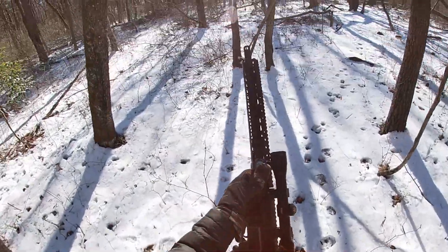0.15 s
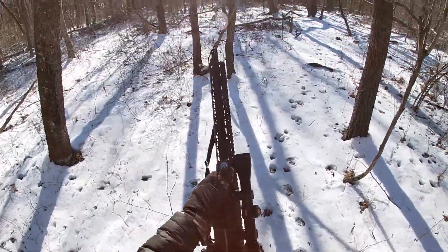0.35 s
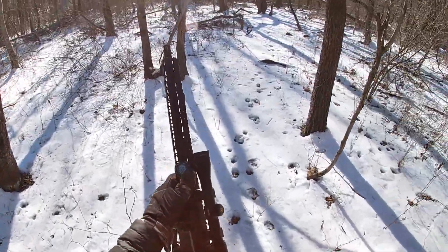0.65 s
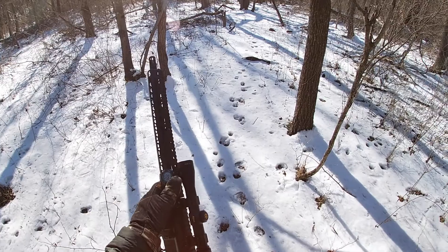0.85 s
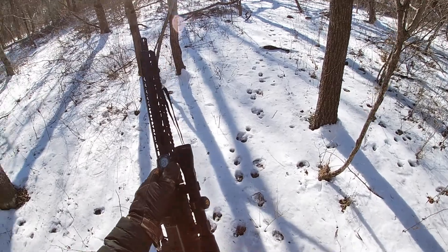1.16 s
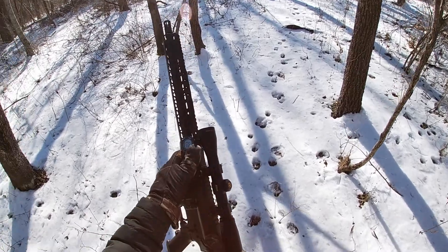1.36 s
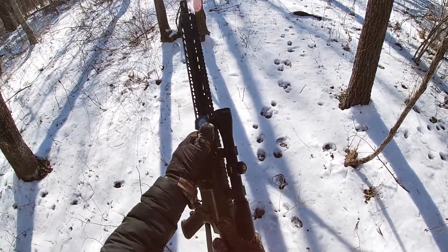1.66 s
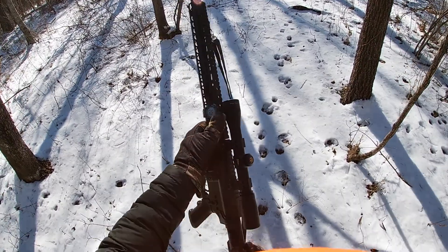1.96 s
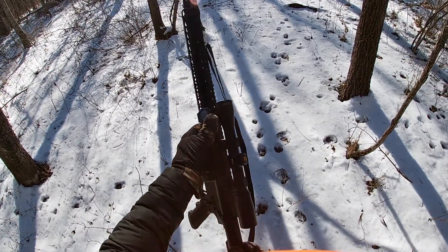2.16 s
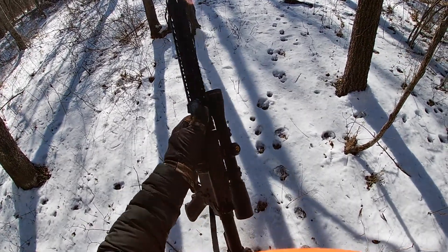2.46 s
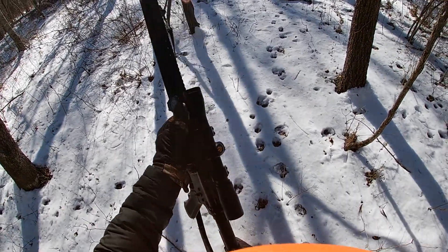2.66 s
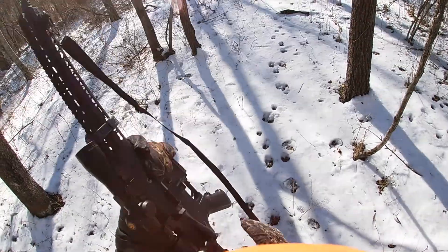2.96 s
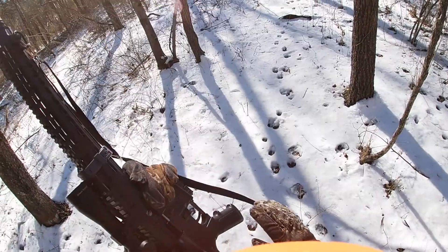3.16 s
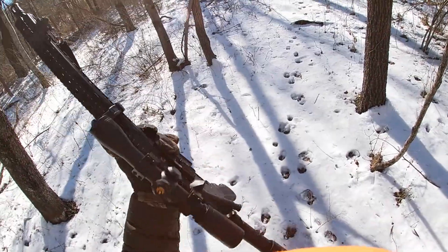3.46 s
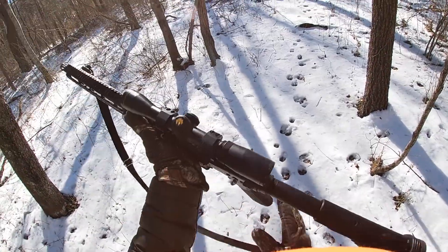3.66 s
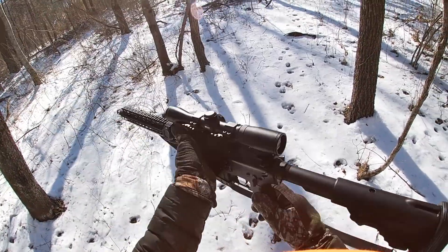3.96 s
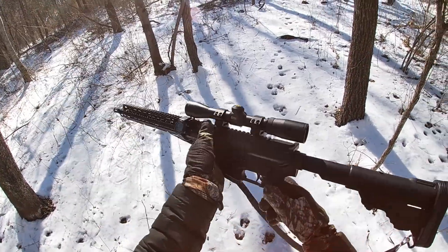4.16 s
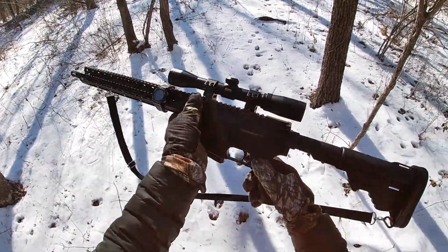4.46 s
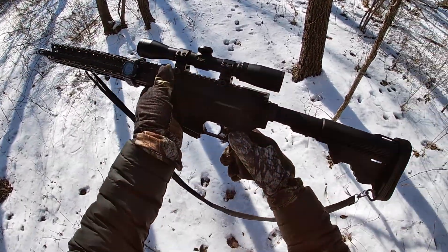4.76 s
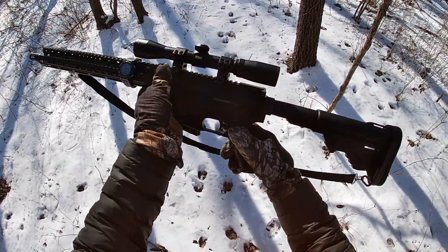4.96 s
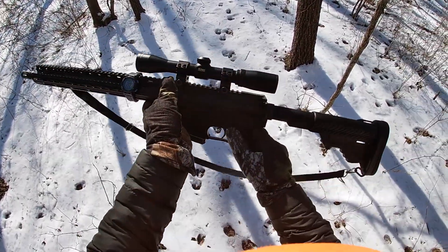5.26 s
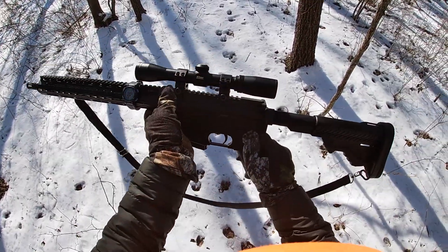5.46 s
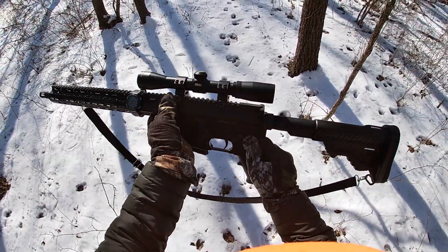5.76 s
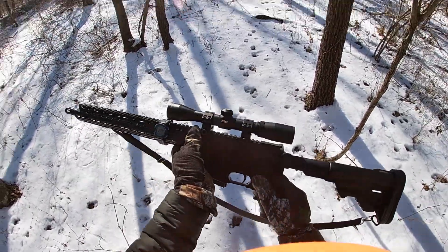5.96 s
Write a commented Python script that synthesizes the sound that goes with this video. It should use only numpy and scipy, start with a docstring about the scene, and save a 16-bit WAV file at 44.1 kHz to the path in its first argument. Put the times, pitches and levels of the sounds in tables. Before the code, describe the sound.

Outdoors among trees, very close and nearly dry. Muted snow crunches about a second apart sit under crisp metallic clicks. Around two seconds a bolt scrapes and clatters back; half a second later it slams forward, the loudest sound, with a short metallic ring and faint woodland echo. The feet stop, then gloves and strap rub and tick quietly, low air drifts, and a final small catch snaps near the end.

```python
"""Snow crunches under three slow steps in a quiet wood, while a rifle is handled close by.
Catches click, the bolt is drawn back and slams shut, the sling swivel pings, and a last catch snaps.
Struck steel is a noise crack with decaying modes; the bolt also sets its recoil spring ringing.
Snow, gloves and sleeves are showers of tiny fractures over finer noise, shaped by each movement.
A low hum swells each time the arms sway, over moving air; the trees answer the steel faintly."""
import sys
import numpy as np
from scipy import signal
from scipy.fft import rfft, irfft, next_fast_len
from scipy.io import wavfile
from scipy.ndimage import map_coordinates

SR = 44100
rng = np.random.default_rng(int(sys.argv[2]) if len(sys.argv) > 2 else 0)


def generate_wav(signal):
    """Clip the signal to [-1, 1] and save it as 16-bit WAV at the path in sys.argv[1]."""
    frames = np.transpose(np.atleast_2d(signal))
    scaled = np.clip(frames, -1, 1) * 32767
    pcm = np.round(scaled).astype(np.int16)
    wavfile.write(sys.argv[1], SR, pcm)


N = 268789
TIME = np.arange(N) / SR  # s
AGE = np.arange(SR * 3 // 4) / SR  # s since a blow

# spectrum of a hard steel contact: (f/Hz, level/dB)
CRACK_SPECTRUM = [(150, -19.5), (500, -6), (1400, -1), (3200, -2), (5600, -3), (7300, -6.5), (9500, -13),
                  (12000, -25), (15500, -26)]
# modes of the steel receiver, damped by the hands: (f/Hz, level/dB, t60/s)
RECEIVER_MODES = [(1020, 1, .046), (1700, -1, .046), (2130, -5.5, .07), (2530, -2, .07), (3200, -6.5, .06),
                  (3620, -4.5, .05), (3970, -1.5, .055), (4930, -7, .054), (5230, -4, .1), (5820, 1, .04),
                  (6140, 1.5, .05), (6480, -10.5, .07), (7190, -7, .12)]
# modes of the hollow handguard: (f/Hz, level/dB, t60/s)
HANDGUARD_MODES = [(1500, -8.5, 0.021), (2010, -8.5, 0.014), (2900, -2, 0.021), (3126, -2, 0.059),
                   (4490, -1.5, 0.026), (4580, -5, 0.016), (5800, -4.5, 0.018), (6400, -3.5, 0.039),
                   (9250, -19, 0.045)]
# spectrum of rubbing glove and strap: (f/Hz, level/dB)
RUB_SPECTRUM = [(400, 5), (800, 1), (1100, 0), (1700, 1), (2500, -3.5), (3200, -4), (3700, -9.5),
                (4600, -10), (5200, -6), (6500, -9.5), (7400, -23), (12000, -33), (15000, -36.5)]
# spectrum of crunching snow, also lent to scratching: (f/Hz, level/dB)
CRUNCH_SPECTRUM = [(530, -33.5), (900, -11.5), (1620, -1.5), (2030, -5), (2390, -4), (3780, -7.5),
                   (7400, -8.5), (8530, -13), (10900, -32), (15000, -41)]
# the arms sway: (t/s, hum level/dB, swish level/dB)
ARM_SWAYS = [(3.918, -48, -72), (5.002, -48, -70), (6.12, -53, -59.5)]


def amp(db):
    """Logarithmic levels: decibels to amplitude gain."""
    return 10 ** (np.asarray(db) / 20)


def unit(x):
    """Normalisation of power: scale to rms 1."""
    return x / np.sqrt(np.mean(x ** 2) + 1e-20)


def along(points, hz):
    """Logarithmic pitch: interpolate (f/Hz, value) points on a log-frequency axis."""
    f, value = np.transpose(points)
    return np.interp(np.log(hz + 1), np.log(f + 1), value)


def fade(t60):
    """Free decay: a damped body loses level at a constant rate, 60 dB in t60 seconds."""
    return 10 ** (-3 * AGE / max(t60, 1e-3))


def add(track, s, sound):
    """Superposition: mix a sound into a track from time s."""
    part = track[max(round(s * SR), 0):][:len(sound)]
    part += sound[:len(part)]


def wobble(rate):
    """Slow fluctuation: a smooth random curve with rate knots a second."""
    knots = rng.standard_normal(int(N * rate / SR) + 4)
    return map_coordinates(knots, [TIME * rate])


def coloured(x, gain_db):
    """Linear filtering: shape x by a dB function of frequency, then scale to rms 1."""
    m = next_fast_len(len(x))
    gain = amp(gain_db(np.fft.rfftfreq(m, 1 / SR)))
    return unit(irfft(rfft(x, m) * gain, m)[:len(x)])


def noise(spectrum):
    """Stationary noise: random pressure with a fixed spectrum."""
    return coloured(rng.standard_normal(N), lambda hz: along(spectrum, hz))


def grains(spectrum, rate, spread_db, bed_db):
    """Shot noise: tiny fractures of uneven size, rate a second, over a bed of finer ones."""
    sizes = amp(spread_db * np.minimum(rng.exponential(size=N), 3)) * rng.choice([-1, 1], N)
    snaps = unit(sizes * (rng.random(N) < rate / SR))
    bed = amp(bed_db) * rng.standard_normal(N)
    return coloured(snaps + bed, lambda hz: along(spectrum, hz))


def hump(hz, centre_hz, q):
    """Resonance: gain in dB of one damped oscillator of sharpness q."""
    detuning = (hz + 1) / centre_hz - centre_hz / (hz + 1)
    return -10 * np.log10(1 + (q * detuning) ** 2)


def swell(s, db, rise_db_per_s, fall_db_per_s):
    """Exponential growth and decay: a gain that climbs to its peak at time s and dies away."""
    rise = (s - TIME) * abs(rise_db_per_s)
    fall = (TIME - s) * abs(fall_db_per_s)
    return amp(db - np.maximum(rise, fall))


def strokes(rows):
    """Friction grows with movement: summed bell-shaped gains from (middle, half length, dB) rows."""
    return sum(amp(db) * np.exp(-((TIME - s) / half) ** 2) for s, half, db in rows)


def ring(modes, scatter_db, centre_hz, q, split=0.01):
    """Modal ringing: clusters of three close modes beat, driven hardest near the blow's pitch."""
    out = np.zeros(len(AGE))
    draws = rng.standard_normal((len(modes), 3, 3))
    for (hz, db, t60), (size, detune, phase) in zip(modes, draws):
        t = AGE[:int(1.5 * t60 * SR)]
        tones = np.sin(2 * np.pi * np.outer(hz * (1 + split * detune), t) + np.pi * phase[:, None])
        cluster = amp(scatter_db * size) @ tones / np.sqrt(3)
        out[:len(t)] += amp(db + hump(hz, centre_hz, q)) * 10 ** (-3 * t / t60) * cluster
    return out


def contact(centre_hz, q, crack_t60, body_db, body_t60, modes_db, spectrum, modes):
    """Impact: a brief broadband crack, then dense, quickly damped ringing of the struck part."""
    colour = lambda hz: along(spectrum, hz) + hump(hz, centre_hz, q)
    crack, body = [coloured(w, colour) for w in rng.standard_normal((2, len(AGE)))]
    # hold the crack's energy to that of its envelope
    crack = unit(crack * fade(crack_t60)) * np.sqrt(np.mean(fade(crack_t60) ** 2))
    tones = ring(modes, 3.5, centre_hz, q)
    blow = crack + amp(body_db) * body * fade(body_t60) + amp(modes_db) * tones
    return blow * (1 - fade(.003))  # soft onset


def clack(hz, q, t60, spring_db):
    """Coupled resonators: steel strikes the receiver and rings the spring, whose touching coils buzz."""
    # modes of the recoil spring: (f/Hz, level/dB, t60/s)
    spring_modes = [(3880, -26, .33), (4220, -24, .33), (4530, -12.5, .16), (4930, -19, .26),
                    (5238, -11, .27), (5390, -10, .4), (5480, -8.5, .17), (5593, -5.5, .36),
                    (5800, -13, .22), (6300, -19, .42), (6578, -21, .38), (6900, -10, .19),
                    (7553, -12.5, .3), (7810, -16, .3), (9500, -29, .3)]
    blow = contact(hz, q, t60, body_db=-20.0, body_t60=0.092, modes_db=-21,
                   spectrum=CRACK_SPECTRUM, modes=RECEIVER_MODES)
    buzz_colour = lambda f: along(CRACK_SPECTRUM, f) + hump(f, 6200, q=2.7)
    buzz = coloured(rng.standard_normal(len(AGE)), buzz_colour)
    spring = ring(spring_modes, 2.7, hz, q=.3) + amp(-13) * buzz * fade(0.4)
    return amp(-5.5) * (blow + amp(spring_db) * spring)


def bolt():
    """Repeated impact: the bolt strikes the receiver and rattles along its travel, harder toward the stop."""
    # blows, drawn back and then flying shut: (t/s, relative level/dB, centre f/Hz, sharpness Q)
    bolt_blows = [(1.8535, -11, 2880, 0.8), (1.8833, -14, 4800, 1.7), (1.9267, -7, 2230, 0.45),
                  (1.9499, -3, 2720, 2.3), (1.971, -3.5, 4500, 0.16), (1.9827, -6, 1300, 1),
                  (1.986, -7, 7300, 1.3), (2.394, -20, 1880, .5), (2.4107, -9.5, 3470, 0.23),
                  (2.4234, -1, 4500, .25), (2.438, -5.5, 1900, 0.31), (2.4545, -4.5, 4100, 1.7),
                  (2.4595, 4.5, 6070, 4.7)]
    # travels of the bolt: (start t/s, stop t/s, relative rattle level at the stop/dB)
    bolt_travels = [(1.86, 1.984, -16.5), (2.424, 2.458, -15.5)]
    crack_t60_s, spring_db = .016, -25.5
    gap_s, growth_db_per_s, rattle_hz = 0.018, 77.5, 3548
    out = np.zeros(N)
    for s, db, hz, q in bolt_blows:
        add(out, s, amp(db) * clack(hz, q, crack_t60_s, spring_db))
    for start, stop, db in bolt_travels:
        chances = rng.uniform(-1, 1, size=(8, 3))
        for k, (shift, size, octaves) in enumerate(chances):
            early = (k + .5 + shift / 2) * gap_s  # time before the stop
            touch = clack(rattle_hz * 2 ** octaves, .6, crack_t60_s, spring_db)
            level = amp(db - growth_db_per_s * early + 2 * size)
            add(out, stop - early, (early < stop - start) * level * touch)
    return out


def catches():
    """Impact of light parts: small catches snap and barely excite the spring."""
    # snaps: (t/s, relative level/dB, centre f/Hz, sharpness Q)
    catch_snaps = [(0.2306, -22.5, 4370, 0.67), (.257, -27.5, 6200, 1.1), (.833, -10, 5230, 0.84),
                   (0.9875, -12.5, 5070, 0.89), (1.3031, -11, 5280, 1), (2.3759, -33.5, 5683, 1.37),
                   (5.423, -17, 5200, 3.6)]
    crack_t60_s, spring_db = .021, -46.5
    out = np.zeros(N)
    for s, db, hz, q in catch_snaps:
        add(out, s, amp(db) * clack(hz, q, crack_t60_s, spring_db))
    return out


def strap():
    """Cavity excitation: the strap taps the hollow handguard, whose short modes answer."""
    # taps: (t/s, relative level/dB, centre f/Hz)
    strap_taps = [(0.3024, -33.5, 2310), (.329, -32, 3780), (.754, -40, 3460), (0.9807, -24.5, 3000),
                  (1.004, -28, 3300), (1.069, -36, 5200), (1.719, -34.5, 2500), (1.7703, -32.5, 6040),
                  (2.289, -46, 3110), (2.881, -44.5, 5330), (3.214, -35, 3490), (3.416, -37, 3200),
                  (3.481, -30, 2900), (3.5973, -34, 4420), (3.88, -30.5, 4050), (4.08, -30, 3590),
                  (4.2365, -36.5, 3100), (4.28, -44, 3160), (4.4157, -43, 3060), (4.9195, -44, 5400)]
    faint_db = -51.5  # relative level of stray touches while the rifle is turned and held
    out = np.zeros(N)
    stray = rng.uniform([2.7, faint_db - 4, 1700], [5.4, faint_db + 4, 3400], size=(8, 3))
    for s, db, hz in [*strap_taps, *stray]:
        tap = contact(hz, q=1.0, crack_t60=0.015, body_db=-25, body_t60=0.056, modes_db=-9,
                      spectrum=RUB_SPECTRUM, modes=HANDGUARD_MODES)
        add(out, s, amp(db - 5.5) * tap)
    return out


def swivel():
    """Free vibration: the steel sling swivel, struck and lightly damped, rings on after the tap."""
    # modes of the swivel: (f/Hz, level/dB, t60/s)
    swivel_modes = [(4470, -22, .15), (5245, -6, .09), (5395, -5, .21), (5600, .5, .115)]
    # pings: (t/s, level/dB)
    swivel_pings = [(2.9852, -58.5), (3.0137, -41.5)]
    out = np.zeros(N)
    for s, db in swivel_pings:
        tap = contact(6700, q=1.0, crack_t60=0.024, body_db=-21.5, body_t60=0.057, modes_db=-26,
                      spectrum=CRACK_SPECTRUM, modes=RECEIVER_MODES)
        tones = ring(swivel_modes, scatter_db=4.5, centre_hz=5570, q=0.69)
        add(out, s, amp(db) * (tap + amp(-1.0) * tones))
    return out


def slides():
    """Friction: sliding sleeve, bolt and catch excite a broad resonance with fine scratching."""
    # slides: (start t/s, end t/s, level/dB, resonance f/Hz, scratch level re body/dB)
    slide_rows = [(1.537, 1.616, -45, 460, -10.5), (1.562, 1.655, -49.5, 587, -1),
                  (1.751, 1.888, -45.5, 906, -22), (1.871, 2.021, -39.5, 1050, -8),
                  (2.425, 2.475, -28, 1310, -4), (3.059, 3.257, -61.5, 500, -33),
                  (5.409, 5.441, -42, 1190, -9)]
    attack_s, release_s = .006, 0.027
    out = np.zeros(N)
    for start, end, db, hz, scratch_db in slide_rows:
        stroke = np.clip((TIME - start) / attack_s, 0, 1) * np.clip((end - TIME) / release_s, 0, 1)
        body = coloured(rng.standard_normal(N), lambda f: hump(f, hz, q=2.2) + hump(f, hz, q=0.3))
        scratch = grains(CRUNCH_SPECTRUM, rate=1200, spread_db=4, bed_db=-4)
        out += amp(db) * stroke * (body + amp(scratch_db) * scratch)
    return out


def knocks():
    """Damped oscillation: dull knocks pass through stock and body, each dying in a few cycles."""
    # knocks: (t/s, relative level/dB, f/Hz)
    knock_rows = [(0.1004, -19, 358), (0.105, -26, 87), (0.431, -33, 418), (0.8234, -19.5, 480),
                  (0.826, -27.5, 156), (1.202, -33, 278), (1.302, -36, 313), (1.539, -32, 199),
                  (1.752, -34, 328), (1.9834, -7, 522), (1.987, -14.5, 281.6), (2.4479, -18, 148.5),
                  (2.456, -12, 158), (2.461, -12.5, 691), (5.423, -38.5, 285)]
    decay_cycles = 4.8  # cycles to fall 60 dB
    out = np.zeros(N)
    for s, db, hz in knock_rows:
        rattle = coloured(rng.standard_normal(len(AGE)), lambda f: 2 * hump(f, hz, q=0.75))
        onset = 1 - np.exp(-(2 * hz * AGE) ** 2)  # a padded contact builds over half a cycle
        tone = np.sin(2 * np.pi * hz * AGE)
        add(out, s, amp(db + 8) * fade(decay_cycles / hz) * onset * (tone + amp(-9.5) * rattle))
    return out


def jolt():
    """Inertia: the slam pushes the microphone, which rebounds and settles slowly."""
    # push, then rebound: (t/s, level/dB, f/Hz, t60/s)
    jolt_rows = [(2.464, 0, 31, 0.046), (2.473, -15, 3.2, .38)]
    out = np.zeros(N)
    for sign, (s, db, hz, t60) in zip([-1, 1], jolt_rows):
        add(out, s, sign * amp(db) * fade(t60) * np.sin(2 * np.pi * hz * AGE))
    return out


def boots():
    """Granular fracture: snow packs under each step and crunches; the crunch dies sooner."""
    # weight comes onto a boot, then the snow settles: (t/s, press level/dB, crunch level/dB)
    step_rows = [(0, -47, -51), (0.848, -46, -52.5), (1.79, -45, -57.5)]
    # spectrum of packed snow: (f/Hz, level/dB)
    press_spectrum = [(59, -34), (100, -2.5), (230, 0.5), (276, 5), (335, -3.5), (427, 1.5), (727, -7),
                      (1800, -18), (2340, -47.5), (3960, -120)]
    load_db_per_s, press_fall_db_per_s, crunch_fall_db_per_s = 102, 19.5, 24.5
    weight = np.max([swell(s, db, load_db_per_s, press_fall_db_per_s) for s, db, _ in step_rows], axis=0)
    breaking = np.max([swell(s, db, load_db_per_s, crunch_fall_db_per_s) for s, _, db in step_rows], axis=0)
    press = weight * amp(1.3 * wobble(30)) * grains(press_spectrum, rate=830, spread_db=2, bed_db=2)
    crunch = breaking * amp(1.7 * wobble(78)) * grains(CRUNCH_SPECTRUM, rate=680, spread_db=7, bed_db=6)
    return (press + crunch) * np.interp(TIME, [2.25, 2.48], [1, 0])  # the feet come to rest


def gloves():
    """Stick-slip friction: gloves rub, the strap slips, and each slip rings the hollow handguard."""
    # a glove shifts its grip: (middle t/s, half length/s, level/dB)
    grip_rows = [(2.82, 0.21, -63.5), (3.13, .12, -68), (3.48, 0.15, -59), (3.9, 0.238, -57.5),
                 (4.33, 0.12, -78)]
    # the strap drags over the handguard: (middle t/s, half length/s, relative level/dB)
    drag_rows = [(3.17, 0.023, -59.5), (3.475, 0.024, -47), (3.602, 0.0075, -55), (4.069, 0.013, -71),
                 (4.232, 0.018, -53.5)]
    grip = strokes(grip_rows)
    rub = grip * amp(3 * wobble(35)) * grains(RUB_SPECTRUM, rate=480, spread_db=4, bed_db=3)
    slip_gain = strokes(drag_rows) + amp(-11) * grip
    slips = slip_gain * grains(RUB_SPECTRUM, rate=1200, spread_db=5.5, bed_db=3.5)
    tube = ring(HANDGUARD_MODES, scatter_db=1, centre_hz=3500, q=.4)
    ringing = signal.fftconvolve(slips, tube / np.linalg.norm(tube))[:N]
    return rub + amp(-12.5) * slips + amp(-4.5) * ringing


def sleeves():
    """Fibre friction: the jacket swishes softly just after each sway of the arms."""
    # spectrum of rubbing cloth: (f/Hz, level/dB)
    cloth_spectrum = [(300, -8), (800, 6), (1500, 7), (2300, -2), (4000, -5.5), (5600, -2.5), (8500, -12),
                      (11000, -29), (15000, -58)]
    lag_s, rise_db_per_s, fall_db_per_s = 0.08, 53.5, 23.5
    swish = sum(swell(s + lag_s, db, rise_db_per_s, fall_db_per_s) for s, _, db in ARM_SWAYS)
    return swish * amp(0.47 * wobble(31)) * grains(cloth_spectrum, rate=1300, spread_db=4.5, bed_db=6)


def trees(x):
    """Diffuse scattering: trunks return a lingering echo whose decay depends on frequency."""
    # decay of the wood: (f/Hz, t60/s)
    wood_decay = [(200, 0.64), (1500, 0.34), (5000, 0.13), (12000, 0.73)]
    hz, t, z = signal.stft(rng.standard_normal(SR), SR, nperseg=256)
    decay = 10 ** (-3 * t / along(wood_decay, hz)[:, None])
    tail = signal.istft(z * decay, SR, nperseg=256)[1]
    return signal.fftconvolve(x, tail / np.linalg.norm(tail))[:N]


def arm_hum():
    """Amplitude modulation: low noise swells and sinks with each sway of the arms."""
    # spectrum of the hum: (f/Hz, level/dB)
    hum_spectrum = [(100, -20.5), (160, -6), (205, -13), (285, 0), (340, -10), (410, -17), (550, -25),
                    (850, -32.5), (1200, -41.5), (2500, -88.5)]
    slope_db_per_s = 24  # on either side of a swell
    gain = np.max([swell(s, db, slope_db_per_s, slope_db_per_s) for s, db, _ in ARM_SWAYS], axis=0)
    return gain * noise(hum_spectrum)


def moving_air():
    """Broadband noise: moving air, strongest in the bass, drifts slightly in level."""
    # spectrum of the air: (f/Hz, level/dB)
    air_spectrum = [(20, -8), (48, -7), (75, -12), (110, -23.5), (230, -21), (420, -26.5), (700, -32.5),
                    (1100, -57), (2200, -66), (5000, -65), (8200, -62.5), (10500, -73.5), (15000, -77.5)]
    return amp(-54.5 + 0.5 * wobble(9.1)) * noise(air_spectrum)


def scene():
    """Phase difference: near, central sources reach two ports that differ mostly in the top treble."""
    # difference between the microphone ports: (f/Hz, level re the common signal/dB)
    port_difference = [(500, -71), (1200, -47.5), (8000, -34.5), (10000, -23.5), (12500, -5), (15000, -4)]
    steel = catches() + bolt() + strap() + swivel() + slides()
    handling = knocks() + jolt() + gloves() + sleeves()
    mono = steel + amp(-22) * trees(steel) + handling + boots() + arm_hum() + moving_air()
    m = next_fast_len(N + SR // 2)
    gain = amp(along(port_difference, np.fft.rfftfreq(m, 1 / SR)))
    side = irfft(1j * rfft(mono, m) * gain, m)[:N]  # a quarter cycle ahead
    return np.array([mono + side, mono - side])


def record(dry):
    """Saturation and band limiting: the highest peaks are rounded, then the top treble is removed."""
    top_hz = 15850
    held = dry / (1 + np.abs(dry / .95) ** 6) ** (1 / 6)
    m = next_fast_len(N + SR // 2)
    return irfft(rfft(held, m) * (np.fft.rfftfreq(m, 1 / SR) < top_hz), m)[:, :N]


dry = scene()
out = record(dry)
generate_wav(out)
```